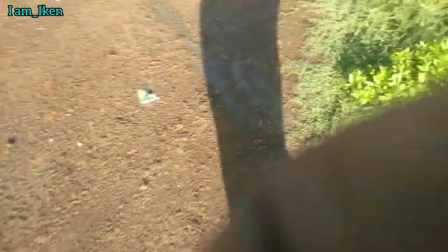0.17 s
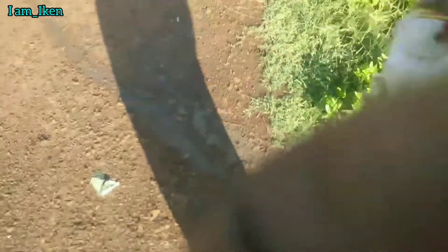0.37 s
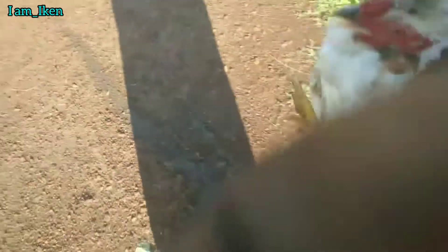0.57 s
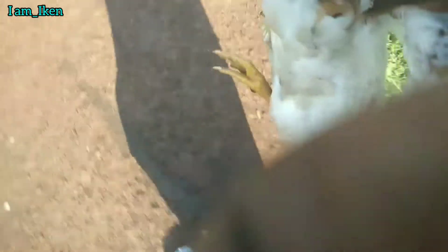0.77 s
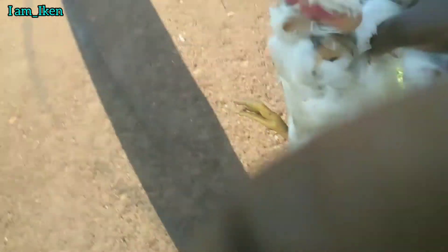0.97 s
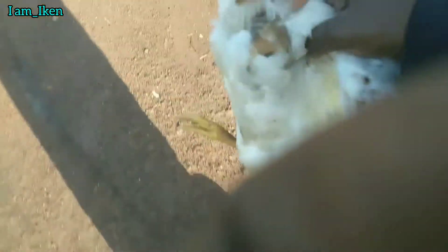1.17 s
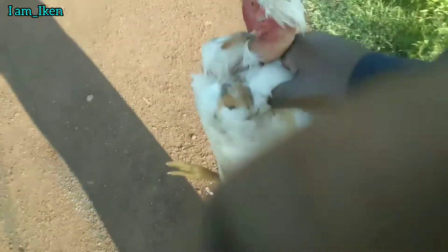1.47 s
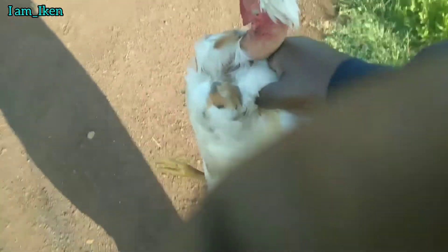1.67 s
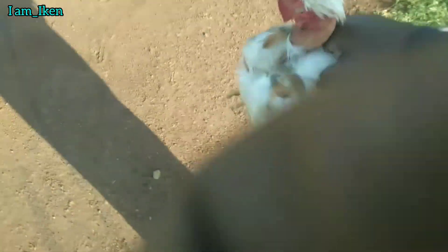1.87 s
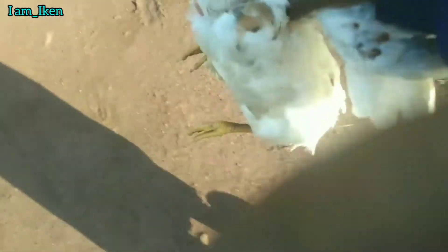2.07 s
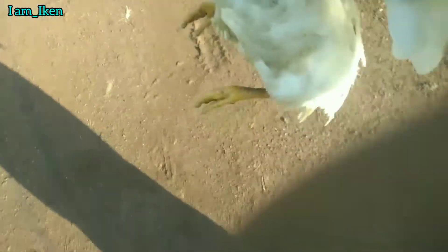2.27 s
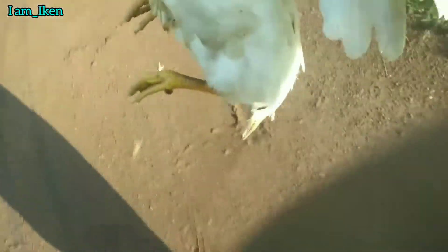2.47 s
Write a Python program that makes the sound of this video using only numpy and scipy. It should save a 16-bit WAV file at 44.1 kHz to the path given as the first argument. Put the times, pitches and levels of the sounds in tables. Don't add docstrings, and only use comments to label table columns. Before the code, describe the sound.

A hen squawks three times, close and harsh. From 0.2 s a pinched rasp swells into a loud fluttering scream, creaking shut at 1.05 s. Light scuffs, grit crackle and a very faint bird chirp fill the gap. A rougher squawk runs 1.4-2.0 s, a shorter one 2.07-2.4 s. A stone clicks between them; another cracks near 2.6 s. Faint distant engines rumble throughout, nearly dry outdoors.

```python
import sys
import numpy as np
from scipy import signal
from scipy.fft import rfft, irfft
from scipy.io import wavfile
from scipy.ndimage import uniform_filter1d, map_coordinates

SR = 44100
rng = np.random.default_rng(int(sys.argv[2]) if len(sys.argv) > 2 else 0)


def linear_from_db(decibels):
    return 10 ** (np.asarray(decibels, float) / 20)


def wrap_up_sound(samples):
    columns = np.atleast_2d(samples).T
    tamed = np.clip(columns, -1, 1)
    steps = np.round(tamed * 32767).astype(np.int16)
    wavfile.write(sys.argv[1], SR, steps)


N = 114660

# time in seconds, level in dB, pitch in Hz.
ONSET_1 = [(.17, -50, 715), (.178, -32, 722), (.24, -25.5, 745), (.275, -24, 825)]
RASP_1 = [(.275, -24, 825), (.305, -20.5, 830), (.38, -21, 825), (.41, -16.5, 755), (.555, -16, 712)]
SCREAM_1 = [(.555, -17, 701), (.605, -13.5, 680), (.65, -16.5, 652), (.79, -16, 625.6), (0.879, -14, 642.7),
            (.957, -14, 624.3)]
CREAK_1 = [(.957, -14.5, 615), (1.012, -16.5, 592), (1.026, -20, 540), (1.039, -26, 480), (1.046, -56, 440)]
RASP_2 = [(1.408, -48, 619), (1.421, -31.5, 709), (1.445, -35, 780.6), (1.47, -29.5, 715.6),
          (1.55, -28, 694.4), (1.63, -29, 712), (1.65, -27, 715.5)]
SCREAM_2 = [(1.65, -24.5, 690), (1.75, -20, 660.2), (1.92, -19, 670), (1.955, -24.5, 619.2),
            (1.972, -29, 539.2), (1.982, -55, 500.4)]
RASP_3 = [(2.068, -44.5, 654.4), (2.08, -30, 676.5), (2.19, -28, 801.3)]
SCREAM_3 = [(2.19, -25.5, 725), (2.25, -19.5, 689.3), (2.32, -18, 648.3), (2.35, -21, 610),
            (2.374, -26, 470), (2.384, -57, 400)]
PARTS = [ONSET_1, RASP_1, SCREAM_1, CREAK_1, RASP_2, SCREAM_2, RASP_3, SCREAM_3]
# frequency in Hz, gain in dB.
THROAT_1 = [
    [(330, -18), (740, 0), (1050, -12), (1560, -8), (2050, -5), (2700, -8), (4200, -18), (5200, -34)],
    [(330, -32), (760, 0), (1050, -10), (1560, -4), (2050, -1), (2850, 6), (4200, -11), (5200, -36)],
    [(330, -33), (650, 0), (950, -11), (1290, -7), (1940, 1), (2570, -5), (3300, 0), (5200, -29)],
    [(330, -33), (600, -4), (900, -6), (1200, 2), (1900, -6), (2450, -4), (3500, -5), (5200, -36)],
]
THROAT_2 = [
    [(330, -21.5), (708, -0.5), (1100, -12), (1400, -5), (2160, -10), (3120, -11), (3900, -16),
     (4800, -48.5)],
    [(330, -28), (660, -5.5), (950, -10), (1310, 0), (2000, -9), (2690, -14.5), (3900, -13.5),
     (4800, -44.5)],
]
THROAT_3 = [
    [(330, -19), (720, -1), (1000, -12), (1320, -6), (2180, -8), (3390, -13), (3900, -27), (4700, -50)],
    [(330, -26), (668, -6), (950, -9.5), (1350, -0.5), (1950, -1), (2950, -9), (3990, -14), (4700, -54)],
]
# frequency in Hz, gain in dB.
TREBLE = [(3000, -30), (4600, -5), (5700, -6), (6600, 0), (8200, -3), (10000, -14), (13000, -32),
          (15800, -42)]
TREBLE_DB = [-23, -18, -15, -24, -30, -26, -26, -29]
AIR_DB = [7, 4, -5, -28, 0, 5, 4, -5]
# lowest partial in dB, throat in dB, treble in dB.
PAN_DB = [(2.5, 3, 4), (3, 2, 3), (2, -1, 1.5), (1, 0, 1.5), (0, 1, 5), (1, 1.5, 4), (-1.5, .5, -.5),
          (-1, 0, -1.5)]
TURNED_DB = [-3, -3, -5, -5, -5, -5, -4, -4]
# start in seconds, roughness from 0 to 1,
# weakening of every second pulse from 0 to 1, flutter in dB.
QUALITY = [(0, .4, .6, 0), (.275, .8, .2, 0), (.415, .1, 0, 0), (.452, .45, .15, 0), (.553, .05, 0, 0),
           (.572, .115, .05, 1.4), (.82, .27, .1, 1.5), (.853, .115, 0, 1.5), (.957, .6, .1, 3),
           (.972, .3, .05, 3), (1.2, .45, .3, 0), (1.5, .22, .5, 0), (1.56, .55, .3, 0),
           (1.655, .33, .15, 4.6), (2.05, .5, .45, 0), (2.14, .2, .6, 0), (2.19, .36, .15, 4),
           (2.36, .6, .1, 0)]
SWELLS = [.59, 0.611, .636, .66, .685, .708, .73, .755, 0.781, .806, 0.829, .848, 0.871, .897, .925, .953,
          .974, 1.002, 1.025, 1.645, 1.668, 1.689, 1.716, 1.741, 1.768, 1.786, 1.804, 1.822, 1.847, 1.869,
          1.898, 1.922, 1.95, 2.197, 2.226, 2.249, 2.271, 2.294, 2.318, 2.345, 2.365]
# start in seconds, end in seconds, pitch in Hz, level in dB.
SQUEAK = (1.445, 1.4635, 1219.5, -36)
SECOND_VOICE = ([(.465, 1520), (.52, 1550), (.558, 1610)], -31)
# time in seconds, level in dB.
GULPS = [
    (1.03, -34.5),
    (1.968, -35),
    (2.37, -42.5),
]
# time in seconds, delay in milliseconds.
ARM_ECHO = [(.2, .275), (.33, .225), (.6, .195), (.75, .21), (.9, .18), (1.45, .228), (1.9, .225),
            (2.2, .25)]
# time in seconds, lateness of the right port in milliseconds.
LAG = [(.2, .25), (.36, .19), (.5, .125), (.62, .08), (.69, .028), (.81, -.032), (.93, -.025), (1., .012),
       (1.42, -.033), (1.7, -.02), (1.88, .01), (2.1, -.07), (2.36, -.1)]
# frequency in Hz, side under mid in dB.
PORTS = [(900, -24), (2200, -13), (5000, -5), (16000, -5)]
# start in seconds, length in seconds, level in dB.
SCUFFS = [
    (1.043, .1, -64),
    (1.142, .15, -60),
    (1.978, 0.085, -57.5),
    (2.377, .08, -62),
    (2.47, .13, -58),
]
# time in seconds, peak in dB.
CRUNCH = [(1.1466, -32), (1.1564, -34), (1.198, -43), (1.215, -39), (1.24, -44), (1.26, -45), (1.288, -46),
          (2.0582, -24), (2.468, -42), (2.498, -44), (2.532, -45), (2.5954, -20.5)]
# frequency in Hz, gain in dB.
GRIT = [(400, -6), (900, -15), (1500, -7.5), (3600, -13), (8400, -12), (12000, -33), (14300, -29),
        (15800, -42)]
# time in seconds, pitch in Hz.
CHIRPS = [
    [(1.082, 5560), (1.093, 4000), (1.106, 7300), (1.143, 7300)],
    [(1.14, 5600), (1.165, 6000), (1.18, 5100), (1.192, 4960)],
    [(2.0, 5250), (2.025, 4750), (2.052, 3380)],
]
CHIRP_DB = [-65, -65, -65]
# frequency in Hz, gain in dB.
RUMBLE = [(20, -24), (65, 0.5), (130, -3), (170, -10), (280, -12), (600, -45)]
DRONE = [(900, -49.5), (1320, -2), (1800, 0.5), (2700, -44)]

JITTER, SHIMMER_DB, HISS = .1, 3.5, 1.2
FLUTTER_SAG = .009
FIRST_HZ, FIRST_FLUTTER = 945, .45
BEAK_HZ, BEAK_SHUTS = 1500, .7
CLOSE_S, CLOSE_DB = .09, -11
BRIGHTENS = .5
TREBLE_HISS, TREBLE_FLUTTER = .65, .6
PATCHY_DB = 4
AIR_HZ, AIR_CLOSE_S, AIR_CLOSE_DB = 9800, .1, -2
GULP_HZ = 259.9
ARM_GAIN, ARM_HZ, ARM_APART_MS = .45, 4600, .004
PORTS_S = 0.0071
YARD_DB, YARD_T60 = -30.5, .15
GRAINS_PER_S, GRAIN_DB, CRUNCH_T60 = 1200, 2.5, 0.024
FAR_HISS_DB, RUMBLE_DB, DRONE_DB = -80, -51.5, -63
TOP = 1.05


def unit(x):
    return x / np.sqrt(np.mean(x ** 2) + 1e-20)


def clock():
    return np.arange(N) / SR


def along(points, hz):
    f, db = np.transpose(points)
    curve = np.interp(np.log(hz + 1), np.log(f + 1), db)
    return curve - 80 * np.log(np.maximum(hz / f[-1], 1))


def wobble(rate):
    knots = rng.standard_normal(int(N * rate / SR) + 4)
    return map_coordinates(knots, [clock() * rate])


def colour(x, gain):
    m = 8192
    cepstrum = irfft(np.log(gain(np.fft.rfftfreq(m, 1 / SR)) + 1e-5), m)
    cepstrum[1:m // 2] *= 2
    cepstrum[m // 2 + 1:] = 0
    ring = irfft(np.exp(rfft(cepstrum)), m)[None, :m // 2]
    return signal.oaconvolve(np.atleast_2d(x), ring, axes=1)[:, :N].squeeze()


def lows(x, hz):
    return signal.sosfiltfilt(signal.butter(3, hz, fs=SR, output="sos"), x)


def gate(start, end, fade_s):
    inside_s = np.minimum(clock() - start, end - clock())
    return np.clip(inside_s / fade_s + .5, 0, 1)


def glide(s, hz):
    return np.sin(2 * np.pi * np.cumsum(np.interp(clock(), s, hz)) / SR)


def wide(x, alike):
    turn = np.arccos(np.clip(alike, 0, 1)) / 2
    mid, side = np.cos(turn) * x[0], np.sin(turn) * x[1]
    return unit(np.array([mid + side, mid - side]))


def hen():
    s, db, hz = np.concatenate(PARTS).T
    level_db = np.interp(clock(), s, db)
    source, flutter_db = syrinx(np.interp(clock(), s, hz))
    breathy = source + TREBLE_HISS * rng.standard_normal(N)
    treble = patchy(colour(breathy, lambda hz: linear_from_db(along(TREBLE, hz))))
    under = lows(treble, AIR_HZ)
    out = np.zeros((2, N))
    shapes = zip(PARTS, THROAT_1 + THROAT_2 + THROAT_3, TREBLE_DB, AIR_DB, PAN_DB, TURNED_DB)
    for rows, shape, treble_db, air_db, pan_db, turned_db in shapes:
        on = gate(rows[0][0], rows[-1][0], .006)
        effort_db = level_db - max(row[1] for row in rows)
        beak_db = BEAK_SHUTS * effort_db + closing(rows, CLOSE_S, CLOSE_DB)
        air_db = air_db + closing(rows, AIR_CLOSE_S, AIR_CLOSE_DB)
        throat = colour(source, lambda hz: linear_from_db(along(shape, hz)))
        first, shut = lows(throat, FIRST_HZ), lows(throat, BEAK_HZ)
        upper = shut - first + (throat - shut) * linear_from_db(beak_db)
        voice = first * linear_from_db(FIRST_FLUTTER * flutter_db) + upper * linear_from_db(flutter_db)
        bright = linear_from_db(treble_db + BRIGHTENS * effort_db + TREBLE_FLUTTER * flutter_db)
        voice = voice + bright * (under + linear_from_db(air_db) * (treble - under))
        strength = np.sqrt(np.sum(on * voice ** 2) / on.sum())
        out += ports(on * linear_from_db(level_db) * voice / strength, pan_db, turned_db)
    out = squeak(arm(out))
    return swing(out + second_voice() + gulps())


def syrinx(pitch_hz):
    s, *columns = np.transpose(QUALITY)
    row = np.searchsorted(s, clock(), "right") - 1
    rough, twin, depth_db = [uniform_filter1d(c[row], size=200) for c in columns]
    swell = np.interp(clock(), SWELLS, np.arange(len(SWELLS)))
    flutter_db = depth_db * np.cos(2 * np.pi * swell)
    uneven = 1 - FLUTTER_SAG * flutter_db + JITTER * rough * wobble(260)
    phase = np.cumsum(pitch_hz * uneven) / SR
    k = np.arange(1, int(phase[-1]))
    at = np.interp(k, phase, np.arange(N))
    i = at.astype(int)
    chance = rng.standard_normal((N, 2))
    size = (1 + twin[i] * (-1.) ** k) * linear_from_db(SHIMMER_DB * rough[i] * chance[k, 0])
    tap = i[:, None] + np.arange(-8, 9)
    away = tap - at[:, None]
    shape = np.sinc(away) * np.cos(np.pi * away / 18) ** 2
    pulses = np.bincount(np.clip(tap, 0, N - 1).ravel(), (size[:, None] * shape).ravel(), N)
    hiss = chance[:, 1] * (1 + np.cos(2 * np.pi * phase)) ** 2
    return unit(pulses) + HISS * rough * unit(hiss), flutter_db


def patchy(x):
    z = signal.stft(x, nperseg=512)[2]
    field = uniform_filter1d(rng.standard_normal(z.shape), size=9, axis=0)
    field = uniform_filter1d(field, size=12, axis=1)
    return signal.istft(z * linear_from_db(PATCHY_DB * unit(field)), nperseg=512)[1][:N]


def closing(rows, close_s, close_db):
    softer = rows[-1][1] < rows[0][1]
    return close_db * softer * np.clip(1 - (rows[-1][0] - clock()) / close_s, 0, 1)


def ports(x, pan_db, turned_db):
    t = np.arange(SR // 50) / SR
    scatter = rng.standard_normal(len(t)) * linear_from_db(-60 * t / PORTS_S)
    scattered = signal.fftconvolve(x, scatter / np.linalg.norm(scatter))[:N]
    side = colour(scattered, lambda hz: linear_from_db(turned_db + along(PORTS, hz)))
    first, throat = lows(x, FIRST_HZ), lows(x, ARM_HZ)
    bands = (first, throat - first, x - throat)
    return sum(v * linear_from_db(np.array([[db / 2], [-db / 2]])) for v, db in zip(bands, pan_db)) + [side, -side]


def arm(x):
    s, delay_ms = np.transpose(ARM_ECHO)
    delay_ms = np.interp(clock(), s, delay_ms)
    late = [clock() - (delay_ms + apart) / 1000 for apart in (-ARM_APART_MS, ARM_APART_MS)]
    echo = [map_coordinates(v - lows(v, ARM_HZ), [t * SR]) for v, t in zip(x, late)]
    return x + ARM_GAIN * np.array(echo)


def squeak(x):
    start, end, hz, db = SQUEAK
    tone = sum(linear_from_db(db - 12.5 * k) * np.sin(2 * np.pi * (k + 1) * hz * clock()) for k in range(3))
    on = gate(start, end, .005)
    return x * (1 - 0.87 * on) + tone * on


def second_voice():
    points, db = SECOND_VOICE
    s, hz = np.transpose(points)
    level = linear_from_db(db + 3 * wobble(60)) * gate(s[0], s[-1], .015)
    return level * glide(clock(), np.interp(clock(), s, hz) + 25 * wobble(90))


def gulps():
    tone = np.sin(2 * np.pi * GULP_HZ * clock())
    return sum(linear_from_db(db) * np.exp(-((clock() - s) / .005) ** 2) * tone for s, db in GULPS)


def swing(x):
    s, lag_ms = np.transpose(LAG)
    lag = np.interp(clock(), s, lag_ms) / 1000 / 2
    moved = [map_coordinates(v, [(clock() + way * lag) * SR], order=5) for v, way in zip(x, (1, -1))]
    return np.array(moved)


def yard(x):
    t = np.arange(SR // 4) / SR
    tail = rng.standard_normal((2, len(t))) * linear_from_db(-60 * t / YARD_T60)
    return linear_from_db(YARD_DB) * signal.fftconvolve(x, tail / np.linalg.norm(tail[0]), axes=1)[:, :N]


def feet():
    clicks = rng.random((2, N)) < GRAINS_PER_S / SR
    grains = clicks * linear_from_db(GRAIN_DB * rng.exponential(size=(2, N)))
    grains = grains + .4 * rng.standard_normal((2, N))
    gain = lambda hz: linear_from_db(along(GRIT, hz))
    drag = sum(linear_from_db(db) * gate(s, s + length, .02) for s, length, db in SCUFFS)
    drag = (drag + linear_from_db(FAR_HISS_DB)) * linear_from_db(3.3 * wobble(40.02))
    crack = sum(linear_from_db(db - 10.5 - 60 * np.abs(clock() - s) / CRUNCH_T60) * (clock() > s) for s, db in CRUNCH)
    stones = wide(colour(rng.standard_normal((2, N)), gain), 0.65)
    return drag * wide(colour(grains, gain), 0.65) + crack * stones


def bird():
    out = np.zeros(N)
    for rows, db in zip(CHIRPS, CHIRP_DB):
        s, hz = np.transpose(rows)
        out += linear_from_db(db) * gate(s[0], s[-1], 0.0052) * glide(s, hz)
    return out


def village():
    def engine(points, alike):
        return wide(colour(rng.standard_normal((2, N)), lambda hz: linear_from_db(along(points, hz))), alike)
    rumble = linear_from_db(RUMBLE_DB + 3 * wobble(7.03)) * engine(RUMBLE, 0.95)
    return rumble + linear_from_db(DRONE_DB + 1.2 * wobble(6)) * engine(DRONE, 1.0)


def scene():
    voice = hen()
    return voice + yard(voice) + feet() + bird() + village()


def top_cut(x):
    return signal.sosfilt(signal.butter(12, 16100, fs=SR, output="sos"), x)


def record(dry):
    mix = dry / (1 + np.abs(dry / TOP) ** 4) ** .25
    return top_cut(mix)


dry = scene()
out = record(dry)
wrap_up_sound(out)
```